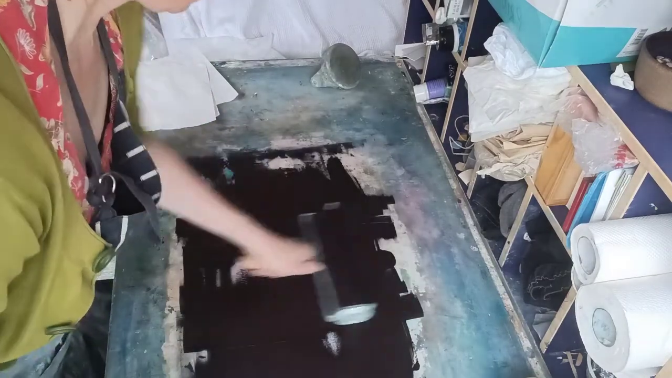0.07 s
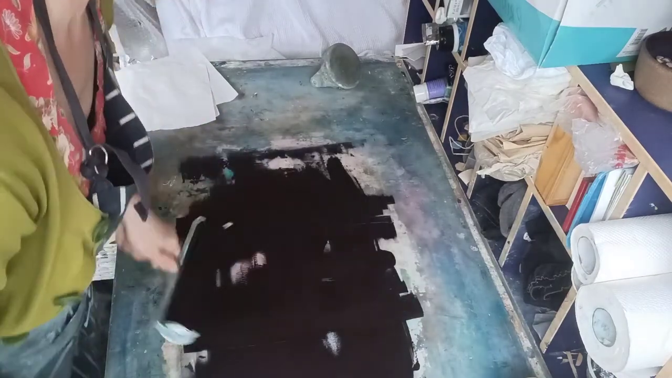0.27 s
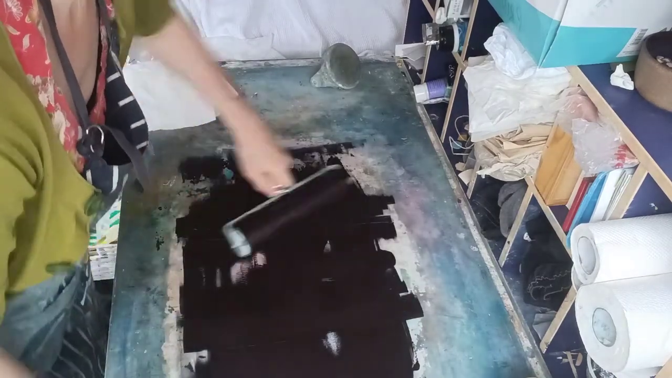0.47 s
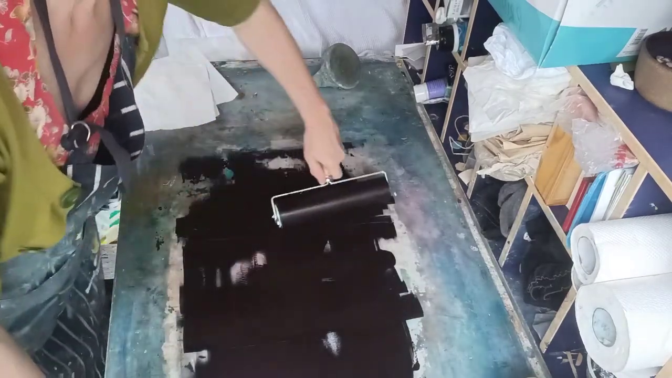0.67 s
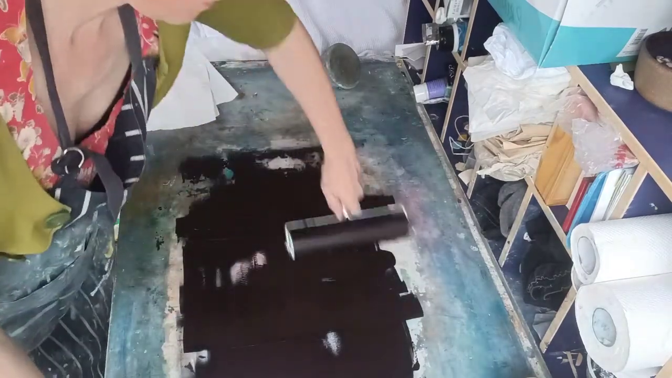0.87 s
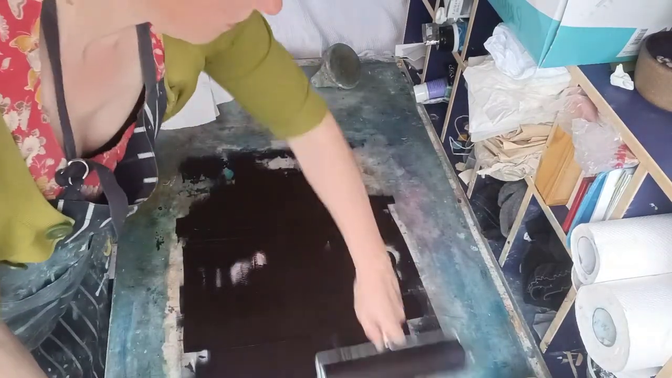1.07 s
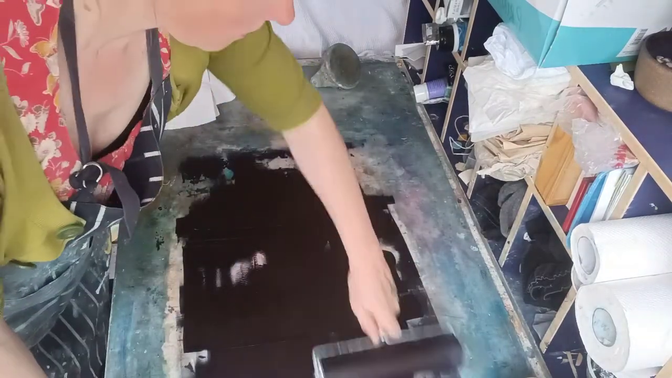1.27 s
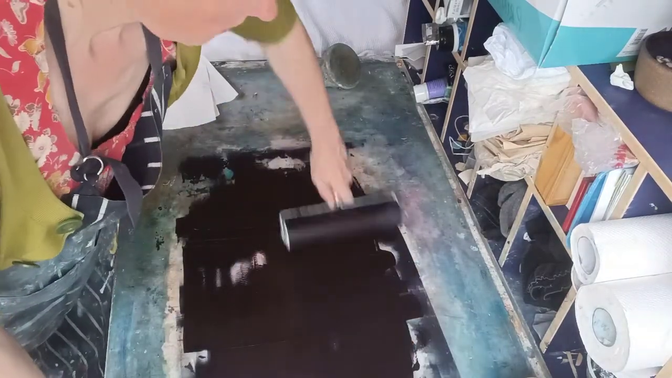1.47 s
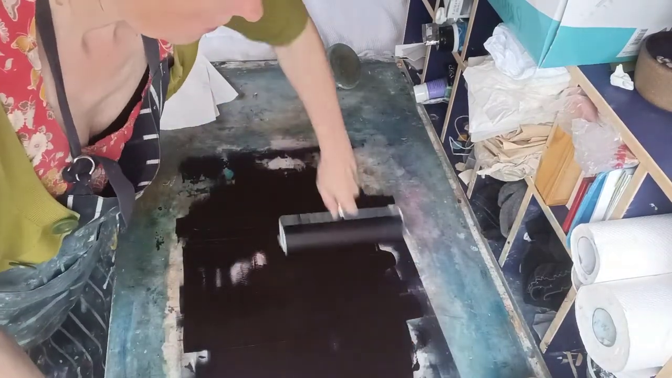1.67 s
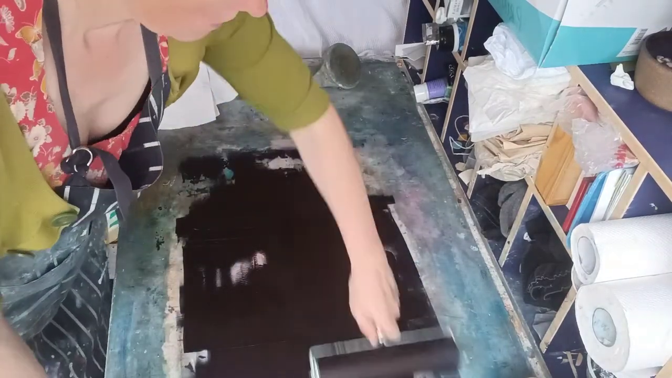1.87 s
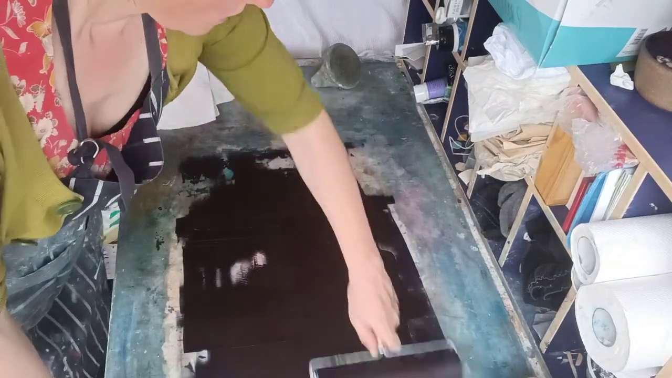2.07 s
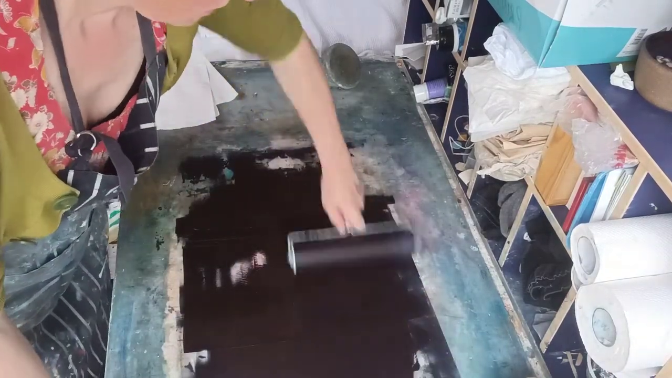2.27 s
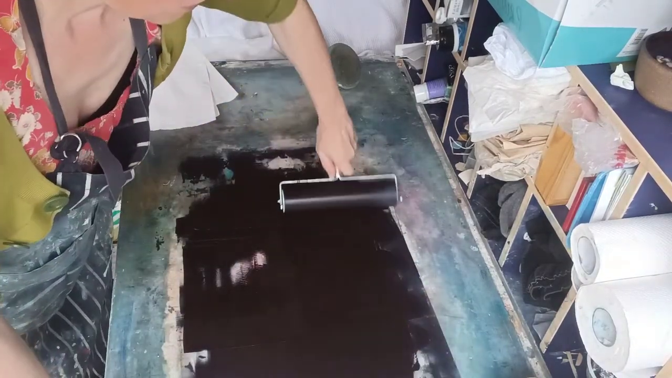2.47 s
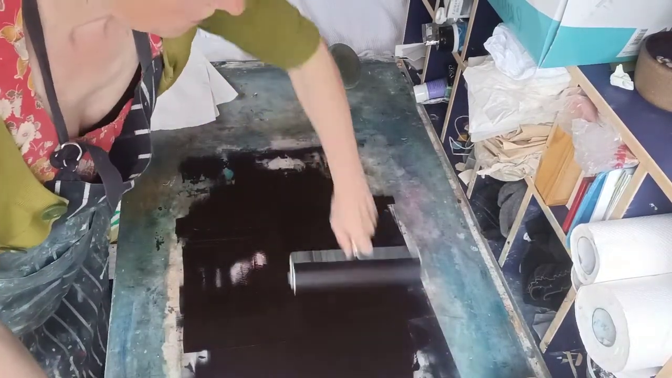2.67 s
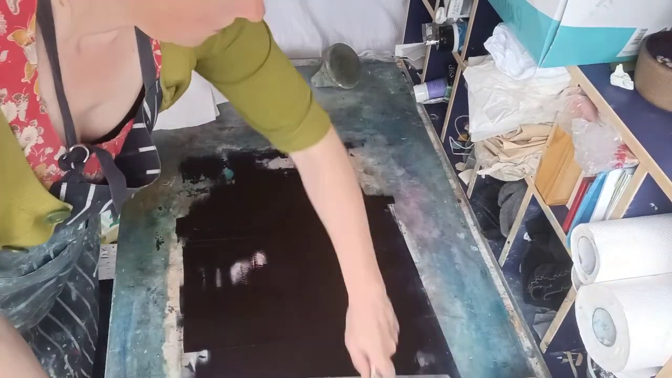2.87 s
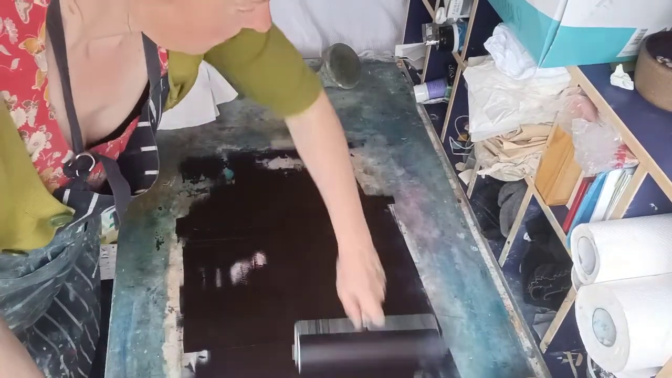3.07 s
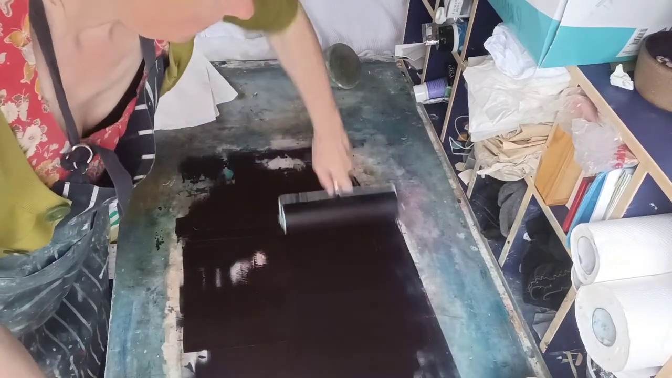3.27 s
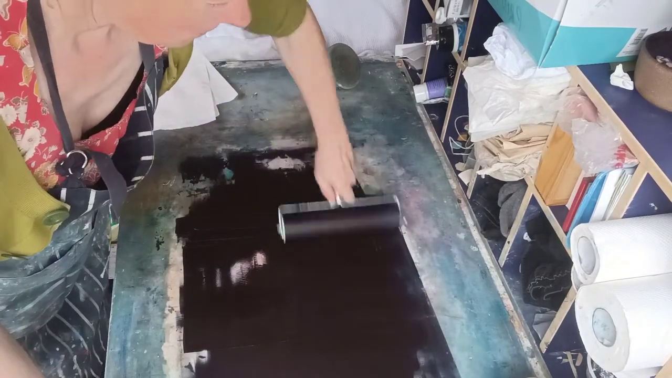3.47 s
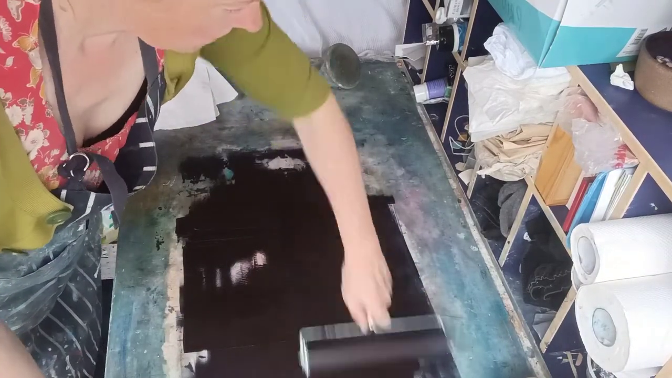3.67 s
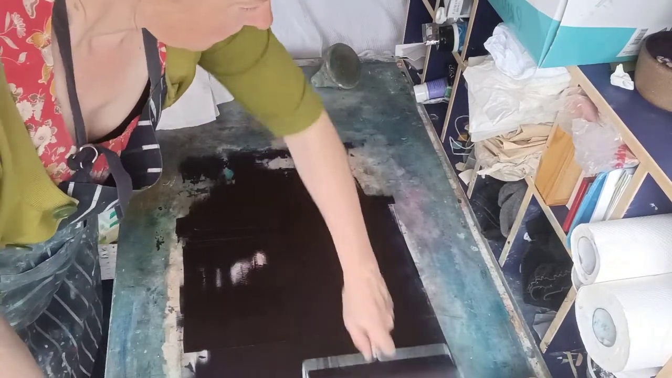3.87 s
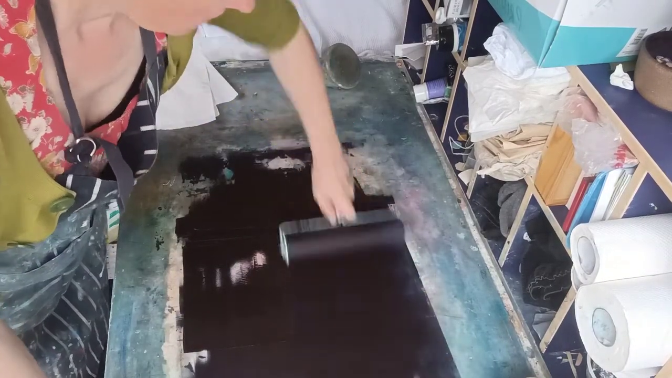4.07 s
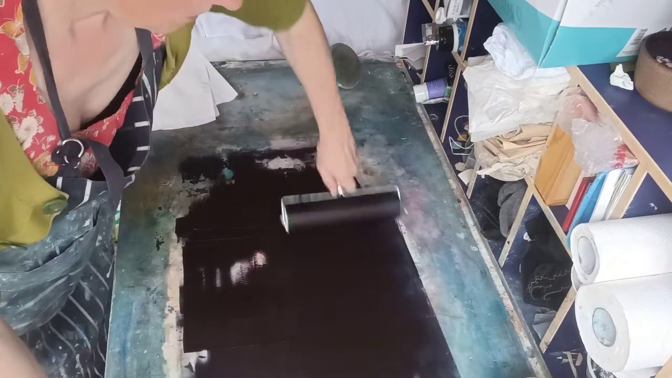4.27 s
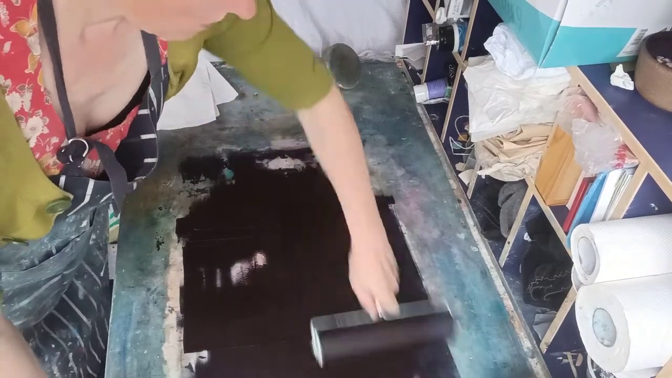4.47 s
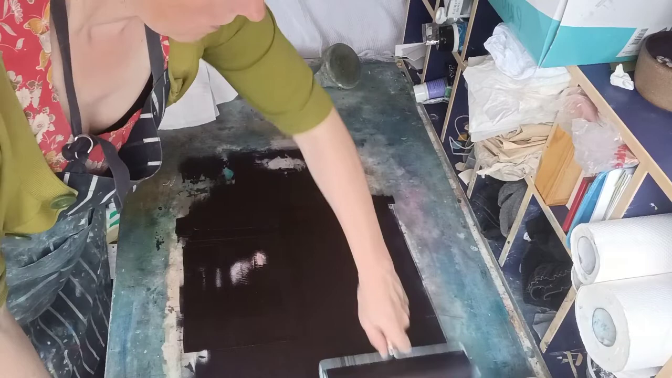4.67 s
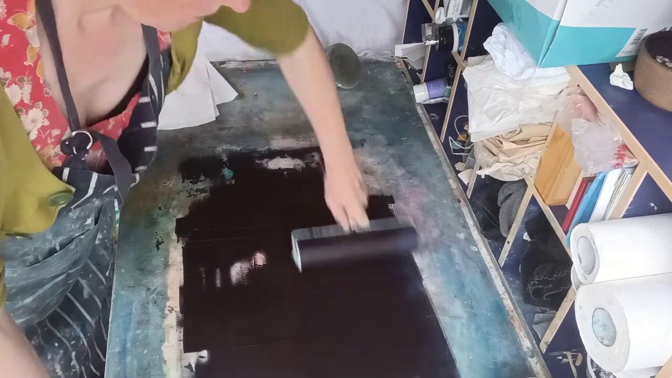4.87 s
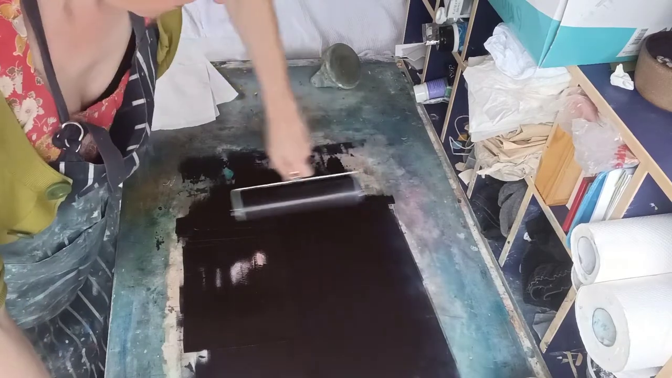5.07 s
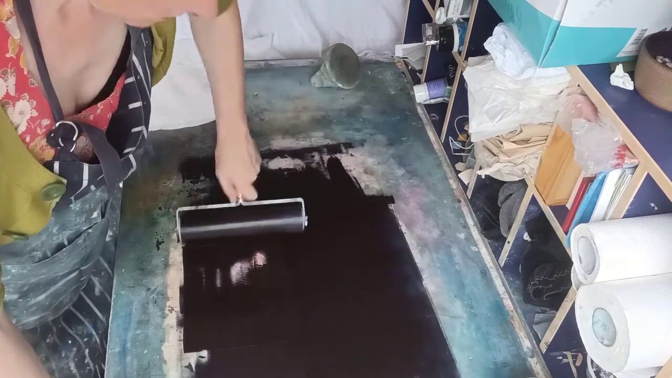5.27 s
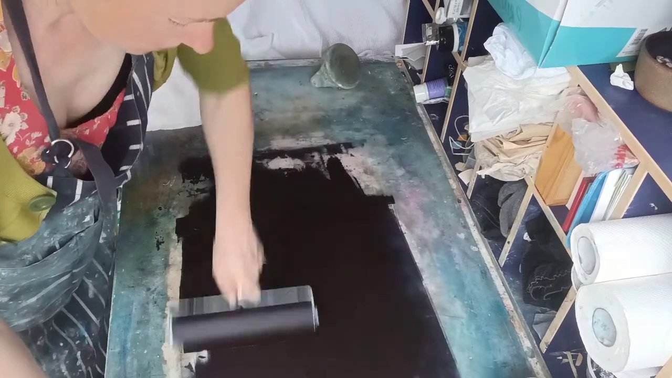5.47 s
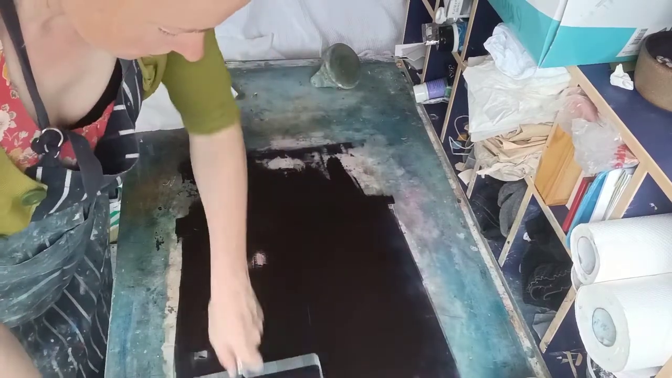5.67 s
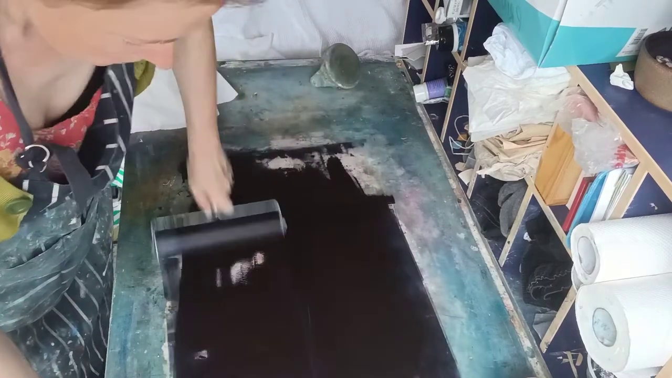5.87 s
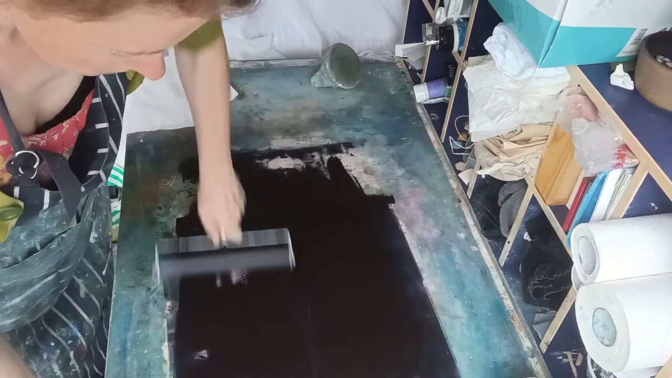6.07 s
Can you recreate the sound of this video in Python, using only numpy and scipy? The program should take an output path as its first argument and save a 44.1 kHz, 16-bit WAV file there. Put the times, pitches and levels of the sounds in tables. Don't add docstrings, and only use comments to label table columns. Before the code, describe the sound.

A hand roller works sticky ink on a table in quick back-and-forth strokes, bright tearing hiss swelling each stroke, with thuds and metallic clicks at turns.

```python
import sys
import numpy as np
from scipy import signal
from scipy.fft import rfft, irfft
from scipy.io import wavfile
from scipy.ndimage import uniform_filter1d

SR = 44100
rng = np.random.default_rng(int(sys.argv[2]) if len(sys.argv) > 2 else 0)


def store_wav(level_fs):
    pcm = np.round(np.clip(np.atleast_2d(level_fs), -1, 1) * 32767)
    wavfile.write(sys.argv[1], SR, pcm.T.astype(np.int16))


def level_to_linear(level):
    exponent = np.asarray(level, float) / 20
    return 10 ** exponent


N = 270112

# (frequency [Hz], level [dB])
ROOM_TONE = [(30, -20), (60, -14), (105, 5.5), (145, -1), (260, 2.5), (600, -10), (1050, -11.5),
             (3000, -20), (8000, -25.5), (9500, -17.5), (11000, -26.5), (13500, -28.5), (15000, -13),
             (16000, -19.5)]
ROOM_DB = -79
REST_DB = -105

# (start [s], fastest [s], end [s], hiss level [dB], extra drop at the slow start [dB])
PUSHES = [
    (.63, .886, 1.078, -41, 22),
    (1.5, 1.712, 1.882, -43.7, 6.5),
    (2.39, 2.644, 2.838, -44, 9),
    (3.3, 3.538, 3.7, -43.8, 10.5),
    (4.17, 4.387, 4.507, -45.7, 3),
    (5.21, 5.377, 5.556, -41.7, 24),
    (5.91, 6.069, 6.19, -41, 12),
]
# (start [s], fastest [s], end [s], hiss level [dB])
PULLS = [
    (-.143, -.009, .195, -46),
    (1.084, 1.359, 1.485, -41.2),
    (1.9, 2.197, 2.357, -42.5),
    (2.832, 3.157, 3.276, -42.4),
    (3.709, 3.992, 4.105, -41.3),
    (4.528, 4.783, 4.905, -43.4),
    (5.523, 5.735, 5.907, -40.8),
]
PRESSURE_DB = [-46.5, -46.5, -48, -45, -46, -43.5, -43, -48.5, -49, -51, -53.5, -48, -48.5, -49.5]
# (time [s], upper mode level [dB])
HOLLOW = [(.91, -52), (1.71, -57), (2.65, -58), (3.55, -57), (4.38, -54), (5.391, -49.5), (6.07, -45.5),
          (.05, -61.5), (1.25, -58), (2.09, -59), (3.03, -62.5), (3.86, -58.5), (4.7, -58.5), (5.78, -50.5)]
# (start [s], end [s], load [dB])
LEANING = (0.26, .58, -83)
GRIP_S, GRIP_DB = 0.061, 24

# (offset [dB], peak delay [s], drop at the start [dB],
# rise curvature [-], drop at the end [dB], fall curvature [-])
HISS_PUSH = (0.1, .001, .1, 1.16, 48, 2.82)
HISS_PULL = (0.1, .001, 57, 6.86, 52, 4.35)
TACK_PUSH = (-9, 0, -0.7, 2, 39.5, 2.6)
TACK_PULL = (-12.5, 0.0276, 68.5, 7, 37.5, 3)
LOAD_PUSH = (0.1, -0.1, -0.5, 0.08, 56.5, 3)
LOAD_PULL = (0.1, -0.0747, 62.5, 3.5, 107, 4)
LOW_PUSH = (3, -0.06, -5, 1, 40.5, 2.5)
LOW_PULL = (6.3, 0.023, 50, 4.26, 32, 2.36)
UPPER_PUSH = (.1, .001, 14.4, 0.76, 40, 1.13)
UPPER_PULL = (.1, .001, 48, 1.9, 41, 1.5)

# (frequency [Hz], level [dB], decay t60 [s])
LOW_MODES = [(101.5, 0.5, 0.089), (158, -5.5, 0.099)]
MIDDLE_MODES = [(268.2, -2, 0.12), (319.8, 2.5, 0.085), (361.4, -1, 0.11)]
UPPER_MODES = [(492.4, -1.5, 0.078), (568.4, -2, 0.056), (699, 4.5, 0.047), (772, -6, 0.1),
               (817.6, 0, 0.091), (932, -12, 0.061)]
# (frequency [Hz], level [dB], decay t60 [s])
BARREL_MODES = [(1145, -4.5, 0.066), (1355, 4, 0.037), (1486, -3.5, 0.055), (1546, -5, 0.05),
                (1700, -6.5, 0.02), (1895, -10.5, 0.098), (2000, -2.5, 0.046), (2250, -7, .025)]
# (frequency [Hz], level [dB], decay t60 [s])
FRAME_MODES = [(1400, 0, .004), (1900, 1, .004), (2500, -17, .04), (2680, -18, .04), (2600, 1, .004),
               (3300, 1, .004), (4000, 0, .004)]
FRAME_TOP_MODES = [(4700, 0, .004), (5300, -14, .025), (5600, 0, .004), (6600, -2, .004), (7800, -4, .004),
                   (9400, -3, .008)]

# (time [s], deepest mode [dB], then relative
# to it: second mode [dB], middle group [dB], upper group [dB])
LANDINGS_AND_BUMPS = [(0.583, -37.5, -18, -27.5, -25), (0.616, -33, -21, 4.5, -1), (0.621, -22, -12, -10, -17),
                      (1.505, -25, -7, -9.5, -28), (2.388, -25, -9, -5.5, -12), (2.392, -22, -5.5, -14, -13),
                      (3.296, -30.5, -5.5, -15, -44), (4.164, -20.5, 8.5, 9, -7), (4.173, -23.5, -16.5, -23, -2.5),
                      (5.182, -20, -9.5, 0, -6), (5.192, -23, -14.5, 2.5, -10.5), (5.207, -18.5, -0.5, -2.5, -9),
                      (5.216, -21.5, 1, -27, -7.5), (5.915, -32.5, 3.5, -15, -23), (1.43, -43, -5, -2, -6),
                      (2.651, -37.5, 4, -1, -11), (4.06, -36.5, -2, -12, -12.5), (4.359, -40, 11.5, -7.5, -8),
                      (5.779, -29, 11.5, 5.5, -6.5), (5.834, -43.5, 13.5, -5, 3.5), (6.041, -45, 16.5, 12, -6.5)]
# (time [s], deepest mode [dB], relative second mode [dB], relative middle group [dB])
BUMPS = [(0.847, -41, -15, -14), (0.955, -42.5, 5, -21), (1.323, -31, -1, -24), (1.685, -32, 1.5, -22),
         (2.531, -35, 2, -14), (2.571, -41, -15, 7.5), (3.015, -38, 4, -2.5), (3.106, -30.5, -8, -9.5),
         (3.116, -38, 6.3, -30), (3.469, -35.5, -2, -3.5), (3.589, -29.5, -19.5, -17),
         (3.954, -33.5, 2.5, -13), (4.122, -48, 1.5, -10), (4.256, -31.5, 3, -7), (3.66, -50.5, 1.5, -16),
         (4.784, -35, -13, -6), (5.75, -45, 4, 3), (5.956, -28, 2, 0)]
BUMP_UPPER_DB = -20.5
# (time [s], level [dB])
BARREL_RINGS = [(.583, -49.5), (0.615, -39), (.622, -36.5), (1.505, -58), (2.387, -45), (4.164, -37),
                (4.173, -42), (4.359, -54), (5.183, -33), (5.19, -35), (5.206, -31), (5.216, -44),
                (5.834, -56), (5.913, -57), (6.041, -53)]
# (time [s], peak level [dB], bright top relative level [dB])
CLICKS = [(0.32, -67, -3), (0.6243, -37, 13.5), (0.7163, -48.5, 22.5), (0.81, -40.5, -16),
          (1.182, -31, -14), (1.506, -43, 0), (1.5452, -50, 25), (1.6101, -37, 10.5), (1.9997, -25, 6.5),
          (2.391, -52, 23), (2.4225, -46, 22), (2.54, -39.5, -18), (2.8135, -50.5, 5), (2.9448, -34.5, -19),
          (2.975, -45.5, 20.5), (3.294, -50, -12), (3.3325, -48.5, 24), (3.44, -39, -5.5),
          (3.8044, -25, -0.5), (3.8217, -42, 16), (4.166, -31, 12), (4.2597, -34.5, 7), (4.5963, -46, -16),
          (4.6103, -36.5, -17.5), (4.764, -43, 17.5), (5.183, -39.5, 10), (5.21, -26.5, 13.5),
          (5.6073, -35, -1), (5.923, -58, 14), (6.0133, -46, 21)]
# (delay [s], level [dB], sign [-])
CHATTER = [(.00067, -5, -1), (.00131, -3, 1), (.00188, -6, -1), (.0027, -6, 1), (.0033, -10, 1)]

# (frequency [Hz], density [dB per Hz])
FIZZ = [(3530, -24.5), (6000, -16), (8110, -15.5), (10000, -3), (12400, -14.5), (13300, -14), (13700, -12),
        (15100, -1.5), (15800, -1.5)]
TACK = [(530, -26), (900, -15), (1070, -29), (1160, -5), (1520, -3.5), (1740, -5.5), (2590, -2),
        (2800, -1.5), (4250, -0.5), (7500, -4.5), (9750, -24), (16500, -120)]
FINEST_DB = 2
# (time [s], hold [s], level [dB])
SQUASHES = [(0.32, .02, -86), (0.524, 0.046, -81.5), (0.574, 0.05, -73.5), (0.618, .01, -51.5),
            (1.188, .005, -51), (1.468, 0.026, -75), (1.503, 0.015, -60), (2.002, .01, -47.5),
            (2.381, .03, -70), (2.801, 0.017, -70), (2.936, 0.011, -48), (3.291, 0.056, -69.5),
            (3.802, 0.016, -47), (4.122, .03, -84), (4.163, 0.024, -47.5), (4.603, 0.012, -51.5),
            (5.181, 0.033, -44), (5.237, 0.054, -62), (5.496, 0.035, -69), (5.875, 0.036, -66.5),
            (5.918, 0.013, -52.5)]
SQUASH_RISE_S, SQUASH_DB_PER_S = 0.0058, 451.5
SQUASH_TACK_DB, SQUASH_FINEST_DB = 2.5, -8.5

# (frequency [Hz], side minus mid [dB])
PORTS = [(60, -34.5), (110, -24), (200, -10), (380, -11), (700, -2), (1290, -1.5), (2380, -1.5), (4400, 2),
         (8120, -5), (15000, -17.5)]
BASS_CUT_HZ, EDGE_HZ = 78.3, 15860


def evened(x):
    return x / np.sqrt(np.mean(x ** 2) + 1e-20)


def colour(x, points):
    f, level_db = np.transpose(points)
    hz = np.fft.rfftfreq(N, 1 / SR)
    curve_db = np.interp(np.log(hz + 1), np.log(f + 1), level_db, left=-90, right=-90)
    return evened(irfft(rfft(x) * level_to_linear(curve_db), N))


def ring(modes, rise_s, detune=0., scatter_db=0.):
    t = np.arange(SR // 5) / SR
    x = np.zeros(len(t))
    for hz, db, t60 in modes:
        shift, weight = rng.standard_normal(2)
        decay = level_to_linear(db + scatter_db * weight - 60 * t / t60)
        x += decay * np.sin(2 * np.pi * hz * (1 + detune * shift) * t)
    x = x * (1 - np.exp(-t / rise_s))
    return x / abs(x).max()


def struck(times, dbs, modes, rise_s, detune, scatter_db):
    x = np.zeros(N + SR)
    for s, db in zip(times, dbs):
        sound = level_to_linear(db) * ring(modes, rise_s, detune, scatter_db)
        x[int(s * SR):][:len(sound)] += sound
    smear = rng.standard_normal(300) * level_to_linear(-np.arange(300) * .12)
    smeared = signal.fftconvolve(x, smear / np.linalg.norm(smear))[:len(x)]
    return np.array([x, smeared])[:, :N]


def snaps(per_s, spread_db):
    size = level_to_linear(spread_db * np.minimum(rng.exponential(1, (2, N)), 5))
    happens = rng.random((2, N)) < per_s / SR
    return size * rng.standard_normal((2, N)) * happens


def flicker(length_s, depth_db):
    size = int(length_s * SR)
    drift = uniform_filter1d(uniform_filter1d(rng.standard_normal(N), size), size)
    return level_to_linear(depth_db * evened(drift))


def patchy(x, depth_db):
    z = signal.stft(x, nperseg=512, noverlap=384)[2]
    field = rng.standard_normal(z.shape[1:])
    field = uniform_filter1d(field, size=6, axis=0)
    field = evened(uniform_filter1d(field, size=14, axis=1))
    return signal.istft(z * level_to_linear(depth_db * field), nperseg=512, noverlap=384)[1][:, :N]


def rolling_db(push_law, pull_law, peaks_db, tops=None):
    t = np.arange(N) / SR
    out = np.full(N, float(REST_DB))
    strokes = PUSHES + PULLS
    if tops is None:
        tops = [row[1] for row in strokes]
    for row, peak_db, top in zip(strokes, peaks_db, tops):
        is_push = row in PUSHES
        offset_db, late_s, start_db, rise, end_db, fall = push_law if is_push else pull_law
        start, top, end = row[0], top + late_s, row[2]
        slow_start_db = sum(row[4:])
        before = np.clip((top - t) / (top - start), 0, 2)
        after = np.clip((t - top) / (end - top), 0, 2)
        level = peak_db + offset_db - (start_db + slow_start_db) * before ** rise - end_db * after ** fall
        if is_push:
            level = level - GRIP_DB * np.clip(1 - (t - start) / GRIP_S, 0, 1) ** 2
            level = np.where(t < start, REST_DB, level)
        out = np.maximum(out, level)
    return out


def squash_gain():
    t = np.arange(N) / SR
    gain = np.zeros(N)
    for s, hold, db in SQUASHES:
        rise = np.clip((t - s) / SQUASH_RISE_S, 0, 1)
        gain += rise * level_to_linear(db - SQUASH_DB_PER_S * np.clip(t - s - hold, 0, 1))
    return gain


def room_tone():
    return level_to_linear(ROOM_DB) * colour(rng.standard_normal((2, N)), ROOM_TONE)


def rumble():
    t = np.arange(N) / SR
    leaning_start, leaning_end, lean_load_db = LEANING
    leaning_db = np.where((t > leaning_start) & (t < leaning_end), lean_load_db, REST_DB)
    load_db = np.maximum(rolling_db(LOAD_PUSH, LOAD_PULL, PRESSURE_DB), leaning_db)
    load_db = uniform_filter1d(load_db, size=800)
    low_db = np.maximum(rolling_db(LOW_PUSH, LOW_PULL, PRESSURE_DB), leaning_db + 7)
    low_db = uniform_filter1d(low_db, size=800)
    hollow_s, hollow_db = np.transpose(HOLLOW)
    upper_db = rolling_db(UPPER_PUSH, UPPER_PULL, hollow_db, hollow_s)
    # modes, rise [s], lumps per second, level [dB]
    layers = ((LOW_MODES, .012, 80, low_db - 8.0),
              (MIDDLE_MODES, .003, 120, load_db - 8.5),
              (UPPER_MODES + BARREL_MODES[:1], .001, 300, upper_db - 6.0))
    out = np.zeros((2, N))
    for modes, rise_s, per_s, db in layers:
        for place in range(4):
            body = ring(modes, rise_s, .06, 2.5)
            body = body / np.linalg.norm(body)
            lumps = evened(snaps(per_s, 2.4)) * level_to_linear(db)
            out += signal.oaconvolve(lumps, body[None], axes=1)[:, :N]
    return out


def blows():
    rows = LANDINGS_AND_BUMPS + [(*row, BUMP_UPPER_DB) for row in BUMPS]
    s, db, second_db, middle_db, upper_db = np.transpose(rows)
    low = struck(s + 0.0009, db - 1.0, LOW_MODES[:1], 0.0073, 0.042, 0)
    second = struck(s + 0.0033, db + second_db - 4.5, LOW_MODES[1:], 0.005, 0.04, 0)
    middle = struck(s + 0.0028, db + middle_db - 2.0, MIDDLE_MODES, 0.0025, 0.055, 3.3)
    upper = struck(s + 0.00322, db + upper_db - 0.5, UPPER_MODES, 0.00067, 0.046, 0.75)
    table = (low + second + middle + upper) * level_to_linear([[0], [-7.0]])
    ring_s, ring_db = np.transpose(BARREL_RINGS)
    barrel = struck(ring_s + 0.003104, ring_db + 0.6, BARREL_MODES, 0.002, 0.027, 3.2)
    return table + barrel


def axle():
    s, db, top_db = np.transpose(CLICKS)
    slap = struck(s + .001, db + 4.0, FRAME_MODES, .0001, 0.054, 6.4)
    slap += struck(s + .001, db + top_db - 6.5, FRAME_TOP_MODES, .00005, 0.049, 0.98)
    slap = -signal.sosfilt(signal.butter(4, 1250, "high", fs=SR, output="sos"), slap)
    out = slap.copy()
    for late_s, level_db, sign in CHATTER:
        out += sign * level_to_linear(level_db) * np.roll(slap, int(late_s * SR), axis=1)
    return out


def ink():
    speed_db = [row[3] for row in PUSHES + PULLS]
    hiss = level_to_linear(rolling_db(HISS_PUSH, HISS_PULL, speed_db))
    pull_apart = level_to_linear(rolling_db(TACK_PUSH, TACK_PULL, speed_db))
    squash = squash_gain()
    film = flicker(0.0089, 0.51) * flicker(0.024, 0.69) * flicker(0.011, 0.74)

    fizz = evened(patchy(colour(snaps(27000, 1.1), FIZZ), 2.3))
    finest = irfft(rfft(fizz) * (np.fft.rfftfreq(N, 1 / SR) > 12800), N)
    fizz = (fizz - finest) * np.hypot(hiss, squash) * level_to_linear(4.0)
    finest = finest * np.hypot(hiss * level_to_linear(FINEST_DB), squash * level_to_linear(SQUASH_FINEST_DB)) * level_to_linear(2.5)

    tack = evened(patchy(colour(snaps(9000, 1.4), TACK), 3.0))
    tack = tack * np.hypot(pull_apart, squash * level_to_linear(SQUASH_TACK_DB)) * level_to_linear(0.8)
    return (fizz + finest + tack) * film


def scene():
    mid, other = rfft(room_tone() + rumble() + blows() + axle() + ink())
    f, side_db = np.transpose(PORTS)
    hz = np.fft.rfftfreq(N, 1 / SR)
    spread = level_to_linear(np.interp(np.log(hz + 1), np.log(f + 1), side_db))
    lag = .35
    lean = -.08
    side = spread * (-1j * lag * mid + np.sqrt(1 - lag ** 2) * other) + lean * mid
    return irfft(np.array([mid + side, mid - side]), N)


def roll_off(x):
    return signal.sosfilt(signal.butter(12, 17110, fs=SR, output="sos"), x)


def record(dry):
    thin = signal.sosfilt(signal.butter(3, BASS_CUT_HZ, "high", fs=SR, output="sos"), dry)
    band_edge = signal.firwin(1023, EDGE_HZ, window=("kaiser", 9), fs=SR)
    limited = signal.oaconvolve(thin, band_edge[None], "same")
    return roll_off(limited)


dry = scene()
out = record(dry)
store_wav(out)
```